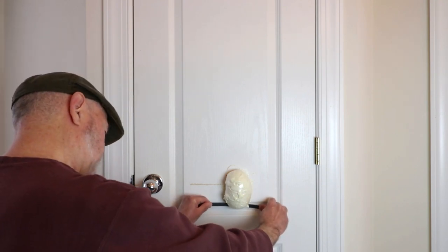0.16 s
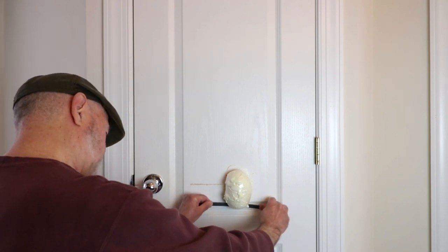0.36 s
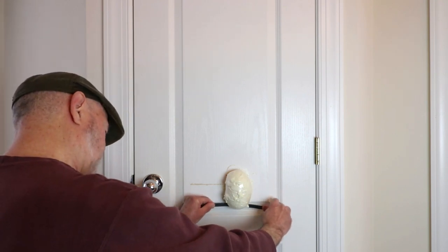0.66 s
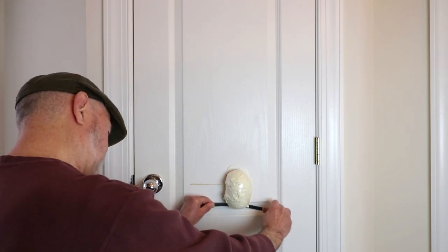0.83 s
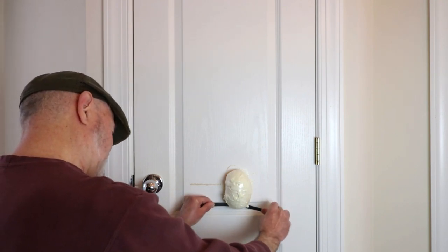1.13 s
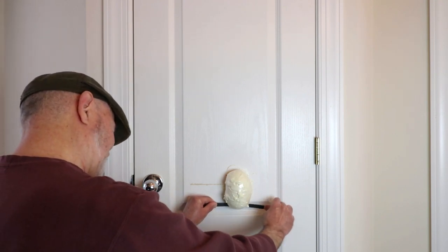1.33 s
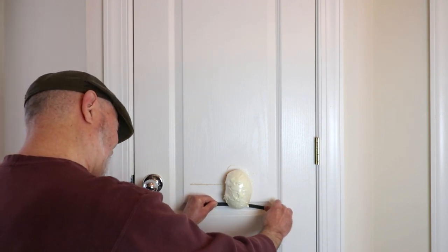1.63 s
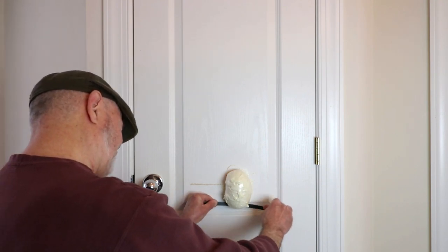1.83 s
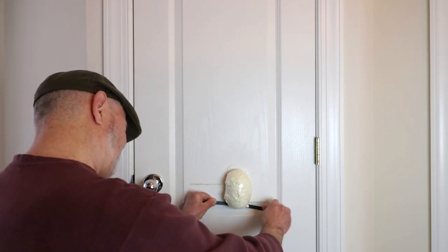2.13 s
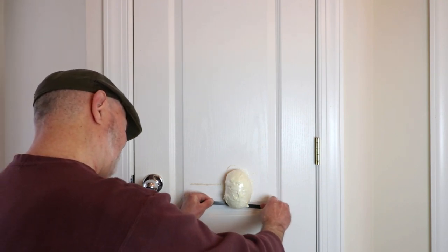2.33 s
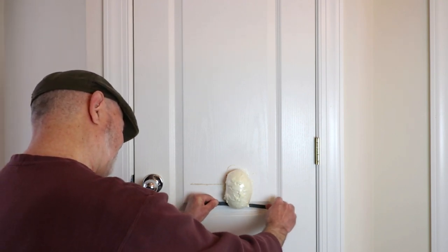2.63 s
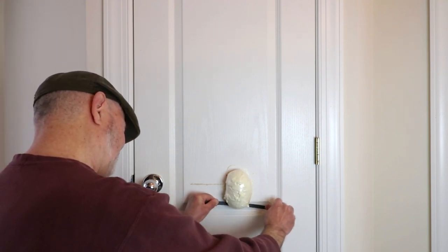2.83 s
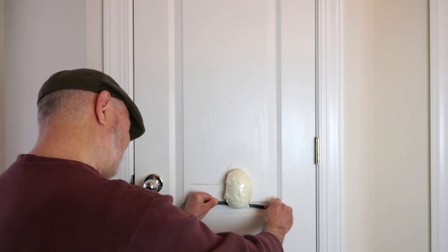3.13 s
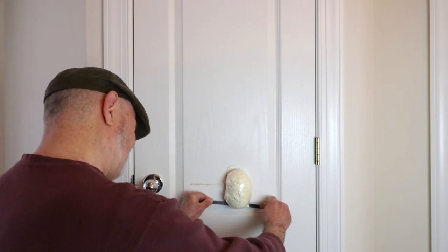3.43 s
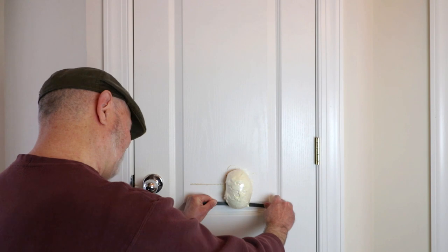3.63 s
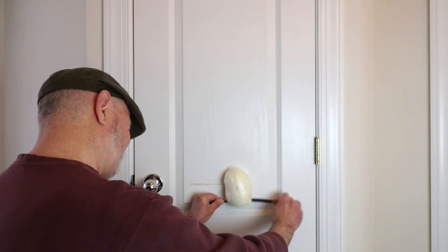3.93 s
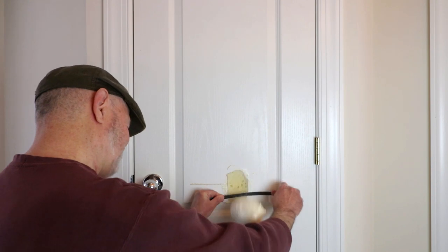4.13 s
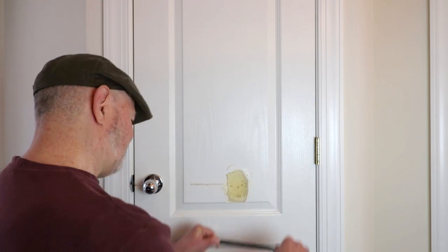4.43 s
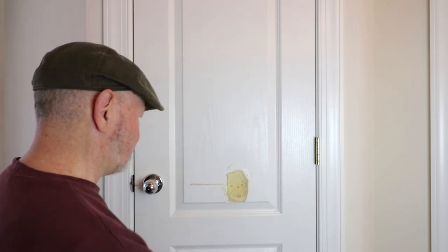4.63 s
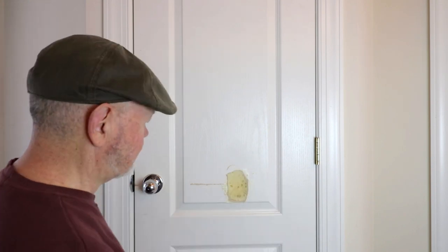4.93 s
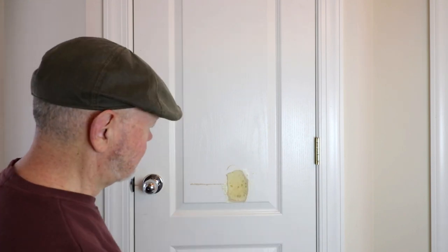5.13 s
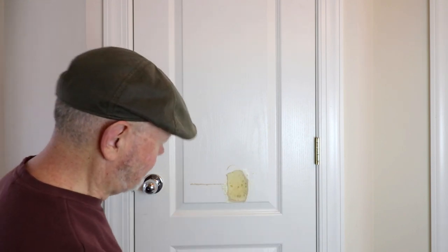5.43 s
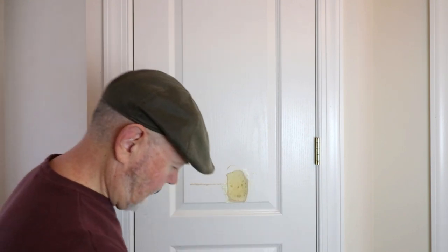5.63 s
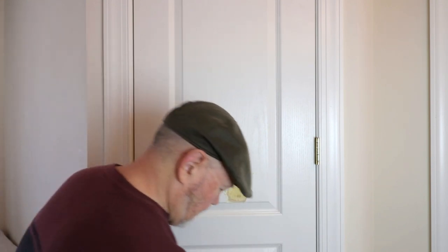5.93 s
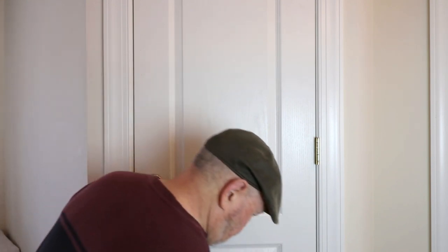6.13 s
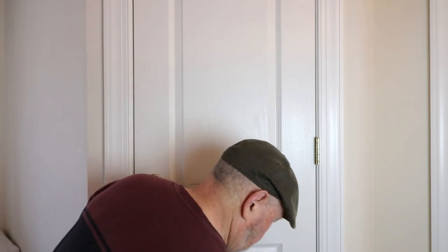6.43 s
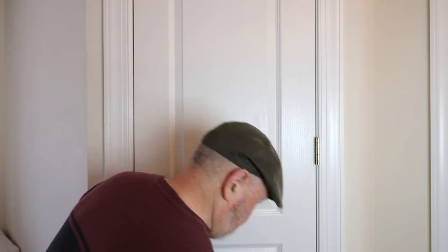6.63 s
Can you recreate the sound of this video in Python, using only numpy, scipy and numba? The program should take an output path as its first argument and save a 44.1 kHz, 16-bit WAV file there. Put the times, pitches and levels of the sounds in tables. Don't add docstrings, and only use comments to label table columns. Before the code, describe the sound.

Uneven gritty saw scrapes and brittle cracks shake a hollow door, then a hard foam lump breaks free, hits the floor, bounces and gets handled.

```python
import sys
import numpy as np
from scipy import signal
from scipy.fft import rfft, irfft
from scipy.io import wavfile
from scipy.ndimage import uniform_filter1d
from numba import njit

SR = 44100
rng = np.random.default_rng(int(sys.argv[2]) if len(sys.argv) > 2 else 0)


def store_pcm(level_fs):
    pcm = np.round(np.clip(level_fs, -1, 1) * 32767).astype(np.int16)
    wavfile.write(sys.argv[1], SR, np.atleast_2d(pcm).T)


def rack_gain(trim_db):
    fader = np.asarray(trim_db, float)
    return 10 ** (fader / 20)


N = 298539
T = np.arange(N) / SR


def unit(x):
    return x / np.sqrt(np.mean(x ** 2))


def peak_unit(x):
    return x / np.abs(x).max()


def band(x, lo_hz, hi_hz):
    sos = signal.butter(3, [lo_hz, min(hi_hz, .45 * SR)], "bandpass", fs=SR, output="sos")
    return signal.sosfilt(sos, x)


def colour(x, points, size=4096):
    hz, db = np.transpose(points)
    bins_hz = np.arange(size // 2 + 1) * SR / size
    log_gain = np.interp(np.log(bins_hz + 1), np.log(hz), db) * np.log(10) / 20
    ceps = irfft(log_gain)
    ceps[1:size // 2] *= 2
    ceps[size // 2 + 1:] = 0
    response = irfft(np.exp(rfft(ceps)))
    return signal.fftconvolve(x, response)[:len(x)]


@njit
def svf(x, hz, width):
    y, b, l = np.empty(len(x)), 0., 0.
    for i in range(len(x)):
        g, k = np.tan(np.pi * hz[i] / SR), width / hz[i]
        v = (b + g * (x[i] - l)) / (1 + g * (g + k))
        b, l, y[i] = 2 * v - b, l + 2 * g * v, k * v
    return y


def resonate(x, hz, width_hz):
    return svf(x, np.full(len(x), float(hz)), float(width_hz))


def walk(rate):
    k = int(SR / rate)
    held = np.repeat(rng.standard_normal(N // k + 1), k)
    return 1.56 * uniform_filter1d(uniform_filter1d(held, k), k)[:N]


def add(out, s, x):
    i = int(s * SR)
    out[i:i + len(x)] += x[:N - i]


def on_curve(table):
    s, db = np.transpose(table)
    return rack_gain(np.interp(T, s, db))


def air():
    # frequency in Hz, level in dB per Hz.
    air_outline = [(59, -26), (100, 3), (149, 0.5), (242, -3), (286, -9), (550, -12), (611, -15),
                   (693, -14.5), (1060, -17), (2780, -18.5), (3290, -13.5), (4910, -22), (15300, -36)]
    # time in seconds, level in dB.
    rustle = [(0, -58.5), (.3, -66), (.5, -51.5), (.95, -81), (1.2, -58.5), (1.6, -50.5), (1.9, -56.5),
              (2.45, -53), (2.95, -66), (3.25, -46), (3.8, -44.5), (4.25, -52.5), (4.45, -67.5), (5.2, -45),
              (5.68, -50.5), (5.95, -48), (6.25, -52), (6.77, -42.5)]
    hiss = unit(colour(rng.standard_normal(N), air_outline))
    fibres = rng.standard_normal(N) * rack_gain(1.2 * walk(70))
    cloth = unit(band(colour(fibres, air_outline), 510, 11200))
    fan = rack_gain(-66) * unit(resonate(rng.standard_normal(N), 241, 11))
    self_noise = rack_gain(-64.5) * rng.standard_normal(N)
    return rack_gain(-60) * hiss + fan + self_noise + on_curve(rustle) * rack_gain(1.38 * walk(9) - 1) * cloth


def pushed(column, rise_db, fall_db, rest_db):
    # time in seconds, sway in dB, drum in dB.
    pushes = np.array([(0, -47, -41.5), (.19, -40.5, -47.5), (.63, -41, -28.5), (.79, -50, -41),
                       (.92, -44, -41.5), (1.32, -41.5, -54), (1.43, -42, -39), (1.53, -37, -34.5),
                       (1.6, -42, -44), (1.731, -39.5, -57), (1.9, -46.5, -51), (2.15, -40.5, -46),
                       (2.33, -47, -31.5), (2.62, -42, -32), (2.79, -33.5, -57), (3.11, -47, -36),
                       (3.26, -39, -52), (3.35, -40, -36), (3.45, -49, -35), (3.58, -32.5, -33),
                       (3.7, -46, -31), (3.87, -33, -29), (3.93, -40, -30.5), (4.03, -31, -33),
                       (4.15, -33, -34.5), (4.38, -45, -54), (4.66, -68, -43), (4.92, -63, -38.5),
                       (6.22, -65, -66), (6.75, -72, -46)])
    late = T - pushes[:, :1]
    db = pushes[:, column, None] + np.minimum(rise_db * late, -fall_db * late)
    return rack_gain(np.maximum(db.max(axis=0), rest_db))


def boom():
    push = rng.standard_normal((2, N))
    sway = unit(band(push[0], 21.2, 67.6))
    drum = unit(resonate(band(push[1], 58.0, 140), 95, 13.7))
    sway_gain = pushed(1, rise_db=150, fall_db=61, rest_db=-67)
    drum_gain = pushed(2, rise_db=210, fall_db=109, rest_db=-63)
    return sway_gain * sway + drum_gain * drum


def thuds():
    # time in s, peak in dB, pitch in Hz, t60 in s, swell in s.
    latch = [(0.16, -32.5, 74, 0.13, 0.0014), (.573, -25, 593, 0.11, 0.0026),
             (0.889, -35, 142, 0.13, 0.0057), (1.16, -43.5, 623, 0.13, 0.012), (1.17, -40, 200, 0.14, 0.02),
             (1.322, -32, 171, 0.025, 0.00065), (1.422, -27.5, 84.6, 0.44, 0.0023),
             (2.122, -29.5, 166.5, 0.18, 0.0035), (2.581, -21, 100, 0.08, 0.0019),
             (3.094, -20, 150, 0.16, 0.0017), (3.1, -28.5, 214.7, 0.24, .01),
             (3.284, -13, 175, 0.074, 0.0037), (3.565, -20, 70.5, 0.12, 0.0048),
             (3.836, -14, 146, 0.089, 0.00087), (3.838, -10.5, 330, 0.02, .001),
             (3.948, -12, 410, 0.086, 0.006), (3.4, -22.5, 191, 0.33, .03), (3.988, -32, 245, 0.72, 0.054)]
    # time in s, peak in dB, pitch in Hz, t60 in s, swell in s.
    bounces = [
        (4.567, -20.5, 150, 0.14, 0.00082),
        (4.566, -8.5, 458, 0.035, 0.00073),
        (4.568, -14.5, 350, 0.054, 0.0013),
        (4.849, -19, 182, 0.084, 0.0022),
        (4.846, -11, 530, 0.03, 0.00074),
        (4.908, -7.5, 249.4, 0.15, 0.013),
        (4.931, -12.5, 396, 0.09, 0.0059),
        (5.762, -41.5, 176, 0.14, 0.0028),
        (6.113, -42, 640, 0.1, 0.0045),
        (6.2, -43, 83, 0.3, 0.018),
    ]
    # time in s, peak in dB,
    # pitch in Hz, t60 in s, swell in s.
    rings = [(.543, -37, 2450, .03, 0.0044), (.565, -32, 2800, .06, .006), (.572, -26, 1420, .08, .006),
             (.59, -29, 1080, 0.22, .01), (1.175, -45, 620, 0.11, .01), (1.25, -48.5, 620, .12, .01),
             (1.258, -51, 3050, .08, .008), (1.425, -35, 610, .15, .006), (1.49, -39, 3600, .04, .004),
             (1.4, -34, 3150, .04, 0.0086), (1.428, -33, 3200, .05, .003), (2.126, -24, 1410, .04, .002),
             (2.181, -25, 1410, 0.039, .002), (3.92, -28, 400, .1, .01), (4.0, -25, 420, .1, .008),
             (4.16, -31, 380, .2, .02), (3.85, -21.5, 177, .12, 0.0045), (3.955, -24.5, 151, .15, 0.0087),
             (4.7, -27, 170, 0.14, .01), (3.3, -26.5, 800, .15, .015), (2.63, -25, 613, .08, .004),
             (2.634, -28, 3600, .05, 0.0026), (2.26, -33, 250, 0.14, .01),
             (2.208, -32.5, 1020, 0.055, .005), (2.245, -35, 1400, 0.087, .008),
             (3.68, -30, 165, 0.19, 0.028), (3.094, -31, 470, 0.037, 0.0023), (3.157, -43, 1850, .04, .002),
             (3.6, -37, 220, .08, .008), (3.282, -23, 660, 0.085, 0.0035), (3.315, -26.5, 1150, 0.24, .02),
             (3.31, -29, 1332, 0.23, 0.022), (3.303, -31, 2310, .08, .008), (3.322, -15, 180, .08, .018),
             (3.35, -18, 620, 0.089, 0.0073), (3.3, -24.5, 640, 0.11, 0.0088), (3.39, -27, 980, .06, .005),
             (3.365, -24, 336, .07, .006), (3.375, -28, 970, .08, 0.007),
             (3.862, -24, 150, .15, 0.0066), (3.885, -23, 135, .15, .006),
                  (3.915, -21.5, 200, .09, .01), (3.97, -25, 520, .15, .012), (3.99, -21, 150, .12, .01),
                  (4.02, -20.5, 264, 0.09, 0.0091), (4.024, -25.5, 600, 0.072, .006),
                  (4.072, -25, 171, .15, .015), (4.06, -28, 330, .12, .01)]
    # time in s, peak in dB, pitch in Hz, t60 in s, swell in s.
    lump_rings = [(4.58, -20, 161, .15, 0.0094), (4.567, -21, 2982, 0.089, 0.0018),
                  (4.57, -23.5, 3413, 0.21, .004), (4.568, -27, 3801, 0.074, .002),
                  (4.57, -27, 1782, .2, .004), (4.57, -29, 2200, .2, .004), (4.59, -24, 465, .12, .008),
                  (4.65, -24, 380, 0.21, .02), (4.675, -29.5, 850, 0.094, 0.011),
                  (4.86, -20.5, 620, .07, .006), (4.91, -18, 420, 0.056, .006), (4.7, -27, 400, .15, .02),
                  (4.847, -21, 2510, .03, .001), (4.87, -26, 1335, .1, 0.011), (5.805, -46, 400, 0.16, .02),
                  (5.902, -40, 1300, .04, .002), (5.904, -42, 1850, .07, .003),
                  (6.482, -41, 3300, .05, .003), (5.903, -38.5, 3200, .07, .003),
                  (5.928, -46, 2700, .1, .006), (5.9, -45, 160, .07, .004), (6.138, -44, 660, .1, .006),
                  (6.18, -54, 660, .06, .004)]
    out, t = np.zeros(N), np.arange(int(.4 * SR)) / SR
    blows = [(*row, True) for row in latch + bounces]
    plain = [(*row, False) for row in rings + lump_rings]
    for s, db, hz, t60, swell, blow in blows + plain:
        fade_from = 0 if blow else swell
        fade = np.exp(-np.log(1000) * np.maximum(t - fade_from, 0) / t60)
        wave = fade * np.sin(2 * np.pi * hz * t)
        if blow:
            wave += 0.23 * fade ** 2 * np.sin(2 * np.pi * 2.3 * hz * t)
        add(out, s, rack_gain(db) * wave * np.minimum(t / swell, 1))
    return band(out, 66, 9400)


def blade():
    # start in s, end in s, start in Hz, end in Hz, level in dB.
    chirps = [
        (1.472, 1.486, 14000, 10500, -41),
        (2.249, 2.259, 13100, 13800, -32),
    ]
    # start in s, end in s, start in Hz, end in Hz, level in dB.
    squeals = [
        (2.245, 2.315, 13400, 13000, -46),
        (2.553, 2.585, 13000, 14100, -34),
        (2.572, 2.615, 14200, 14000, -33),
        (2.612, 2.628, 8600, 7500, -38),
    ]
    # start in s, end in s, start in Hz, end in Hz, level in dB.
    hisses = [(2.225, 2.3, 15000, 14200, -51), (1.585, 1.635, 8800, 8800, -54),
              (2.54, 2.63, 6200, 6200, -43), (2.63, 2.72, 6500, 5800, -35), (3.257, 3.38, 9800, 9000, -45),
              (3.856, 3.94, 9800, 9500, -45), (3.955, 4.09, 9800, 9000, -46)]
    skips_s = [2.657, 2.667, 2.675, 2.686, 2.698, 2.706, 2.712, 2.72, 2.726, 2.733, 2.738, 2.744, 2.75,
               2.755, 2.76, 2.772, 2.798]
    out = np.zeros(N)
    for rows, width_hz in ((chirps, 250), (squeals, 1200), (hisses, 2200)):
        for t0, t1, hz0, hz1, db in rows:
            u = np.arange(int((t1 - t0) * SR)) / ((t1 - t0) * SR)
            hz = hz0 + (hz1 - hz0) * u
            noise = rng.standard_normal(size=8000)[:len(u)]
            squeal = svf(svf(noise, hz, 1. * width_hz), hz, 2. * width_hz)
            add(out, t0, rack_gain(db) * unit(squeal) * np.sin(np.pi * u) ** .5)
    chatter_hz, chatter_width_hz, chatter_db = 13800, 2000, -29
    chance = rng.standard_normal((40, 2))[:len(skips_s)]
    times = skips_s + .0002 * chance[:, 0]
    teeth = np.zeros(N)
    teeth[(times * SR).astype(int)] = rack_gain(2 * chance[:, 1])
    to_peak = SR / (2 * np.pi * chatter_width_hz)
    return out + rack_gain(chatter_db) * to_peak * resonate(teeth, chatter_hz, chatter_width_hz)


def sparks():
    # time in seconds, peak in dB, pitch in Hz.
    grains = [(.534, -44, 7000), (.553, -38, 7000), (.784, -48, 6500), (.987, -51, 10000),
              (1.048, -53, 9000), (1.18, -51, 8500), (1.186, -52, 9500), (1.268, -52, 9000),
              (1.333, -53, 9000), (1.362, -52, 8000), (3.255, -40, 9000), (3.284, -25, 8000),
              (3.291, -34, 8000), (3.313, -34, 9000), (3.326, -30, 9500), (3.336, -37, 9500),
              (3.347, -36, 10000), (3.365, -35, 8500), (3.373, -36, 8500), (3.618, -38, 8000),
              (3.757, -45, 13500), (3.818, -48, 9000), (3.832, -45, 10000), (3.844, -48, 11000),
              (3.872, -38, 9500), (4.037, -30, 11500), (4.96, -36, 7000), (5.215, -42, 7000),
              (6.609, -38.5, 7000)]
    out, t = np.zeros(N), np.arange(int(.01 * SR)) / SR
    for (s, db, hz), noise in zip(grains, rng.standard_normal((len(grains), len(t)))):
        tick = resonate(noise * np.exp(-t / .0012), hz, 0.41 * hz)
        add(out, s, rack_gain(db) * peak_unit(tick))
    return out


def snaps():
    # time in s, peak in dB,
    # then body, crack and ring shares in dB.
    shallow = [(1.4066, -36, -3, -12, 4), (1.4286, -28, -1.5, -0.5, -3), (1.6885, -31, -13, -15, -16),
               (2.602, -30, 6.5, -11, -11), (2.6275, -9, -6.5, 6.5, -6.5), (3.096, -35, -13, -14, -14),
               (3.122, -31.5, -6, -16, -19), (3.159, -26, -25, -3.5, -16), (3.26, -26, -22, -7, -3),
               (3.283, -18, -0.5, -11, -1), (3.8547, -12, -13, 1, -6.5), (3.9507, -3.5, -7.5, -4.5, -9.5),
               (4.03, -12.5, -6, -0.5, -7.5), (4.038, -20, -11, 1.5, -11), (4.567, 1, -7.5, -34, -8.5),
               (5.0514, -24, -1.5, -21, -9), (5.1215, -32, -21, -14, 0.5), (5.1685, -33, 1, -27, -17),
               (5.905, -36, -9, -18, -12), (6.4836, -32.5, -14, -23, -3.5), (6.634, -20, -11, -8, -5.5)]
    # time in s, peak in dB, then
    # body, crack and ring shares in dB.
    deep = [(0.568, -20, -2, -2, -8), (.587, -17, -4.5, -20, 0.5), (1.5355, -35, -10, 3, -6),
            (1.7601, -26.5, -4.5, -14, -12.5), (2.0908, -36.5, -8, -8, -5), (2.1252, -14, -14, -13.5, -7.5),
            (2.1803, -15, -17, -12, -6), (4.8465, -5, -7.5, -11, -15), (5.21, -26, -8, -16, -25.5)]
    # time in seconds, peak in dB.
    ticks = [(0.279, -44.5), (0.3187, -40.5), (.548, -34), (0.9804, -39), (1.717, -39), (2.97, -41),
             (3.0056, -42.5), (3.09, -41), (3.757, -41), (3.832, -47), (5.0674, -41)]
    # frequency in Hz, level in dB per Hz.
    knock = [(150, -30), (250, -11.5), (365, -8), (412, -6), (465, -11), (834, -10), (1030, -22),
             (1200, -8), (3420, -4.5), (4060, -14), (15300, -35.5)]
    gap_hz, deep_gap_hz = 3110, 1344
    breaks = [(gap_hz, *row) for row in shallow]
    breaks += [(deep_gap_hz, *row) for row in deep]
    breaks += [(gap_hz, *row, -12, 4, -12) for row in ticks]
    out, t = np.zeros(N), np.arange(int(.06 * SR)) / SR
    noises = rng.standard_normal((len(breaks), len(t)))
    for (hz, s, db, body_db, crack_db, ring_db), noise in zip(breaks, noises):
        crumbs = noise * np.exp(-t / 0.006)
        burst = colour((t == 0) + 0.036 * crumbs, knock, size=1024)
        click = band(burst, 1510, 5600)
        gap = resonate(resonate(crumbs, hz, 0.33 * hz), hz, 1.06 * hz)
        body = band(burst, 172, 1033)
        crack = band(burst + 0.0036 * crumbs, 5000, 13100)
        layers = (click, 0), (gap, ring_db + 4), (body, body_db), (crack, crack_db)
        add(out, s, sum(rack_gain(db + share_db) * peak_unit(x) for x, share_db in layers))
    return out


def panel(x):
    # frequency in Hz, width in Hz, level in dB.
    modes = [(167, 57, 2.5), (236, 22, 2.5), (291, 25, -3.5), (455, 87, -10), (595, 25, -3.5),
             (672, 8.2, -4), (987, 230, -1.5), (1100, 180, -3), (1390, 106, 5.5)]
    return x + sum(rack_gain(db + 3.5) * resonate(x, hz, width_hz) for hz, width_hz, db in modes)


def strokes():
    # start in s, length in s, rasp in dB, door and
    # fine dust shares in dB.
    jerks = [(.574, 0.089, -26, 4, -21), (1.418, 0.082, -34, 0, -4), (1.486, 0.039, -33.5, 1, -12),
             (1.695, 0.046, -42.5, -2, -10), (1.77, 0.039, -44, 4.5, -5), (2.13, 0.12, -27.5, 0, -23),
             (2.254, .076, -28.5, 1.5, -13), (2.635, 0.083, -22, -9.5, -24), (3.352, 0.068, -23.5, 5, -30),
             (3.55, 0.031, -35, -8, -16), (3.865, 0.031, -26.5, 2, -22), (3.96, .06, -33, 3, -21),
             (4.032, 0.075, -26, 3, -20), (4.575, 0.18, -23.5, -6.5, -20.5),
             (4.852, 0.052, -18.5, -2.5, -20), (4.91, 0.11, -25.5, 0, -23), (5.068, .04, -31, 2, -27),
             (5.904, 0.052, -39.5, -6, -30), (6.484, 0.045, -38, -6.5, -11), (6.72, 0.039, -35, 1.5, -20)]
    # start in s, length in s, rasp in dB, door and fine
    # dust shares in dB.
    swells = [(.533, 0.051, -30.5, -1, -13), (1.456, 0.033, -36, -2, -3), (1.58, 0.057, -48.5, -12, 0.5),
              (1.74, 0.033, -45, -4, -0.5), (2.216, 0.04, -30.5, 0.5, -7.5), (2.52, 0.099, -31, 0, -6.5),
              (3.1, 0.096, -46, 0, -7), (3.254, 0.097, -22.5, -1.5, -10), (3.575, .045, -37.5, -11, -17),
              (5.11, 0.11, -41.5, -5.5, -21), (5.715, 0.15, -46, -4.5, -11), (6.57, 0.097, -35, -9.5, -19)]
    # start in s, length in s, rasp in dB, door and fine
    # dust shares in dB.
    drags = [(1.16, 0.029, -51.5, 3, -6), (2.645, 0.12, -27, -9.5, -13), (3.617, 0.11, -31, -4, -9),
             (3.895, 0.057, -29.5, 0.5, -10), (4.62, 0.07, -27.5, -3.5, -24),
             (4.315, 0.033, -45.5, 0.5, -13), (4.955, 0.034, -34, 2, -6), (5.21, 0.16, -39.5, -14.5, -8),
             (6.635, 0.083, -27.5, -6.5, -12)]
    # time in seconds, level in dB.
    grip = [(0, -10.5), (1.4, -1), (2.2, -3.5), (2.7, -3.5), (3.1, 14.5), (3.4, -5), (3.87, 5), (4.1, 3.5),
            (4.9, 3), (6.77, -4)]
    # share of the length up to the peak, dB at the start, dB at the end
    kinds = (jerks, (0.072, 2.8, -15)), (swells, (0.57, -14, -1.5)), (drags, (0.35, -5, -3.5))
    power = np.zeros((4, N))
    for table, (rise, start_db, end_db) in kinds:
        for s, length, db, door_db, dust_db in table:
            u = (T - s) / length
            contact = np.clip(np.minimum((T - s) / 0.0096 + .5, (s + length - T) / 0.015 + 1), 0, 1)
            door_db = door_db + 3 * np.clip(u, 0, 1)
            dust_db = dust_db - 6 * np.clip(u, 0, 1)
            gain = contact * rack_gain(db - 4.5 + np.interp(u, [0, rise, 1], [start_db, 0, end_db]))
            power += (gain * rack_gain(np.array([0 * u, door_db, dust_db, door_db]))) ** 2
    gains = np.sqrt(power)
    gains[3] *= on_curve(grip)
    return gains


def rasp():
    # frequency in Hz, level in dB per Hz.
    rasp_outline = [(76, -43.5), (130, -9.5), (179, -2), (246, -7.5), (325, -6.5), (536, -9.5), (604, -7.5),
                    (831, -12), (1120, -14.5), (1570, -15), (3290, -9.5), (6110, -25.5), (15300, -43)]
    # time in seconds, level in dB.
    middle_level = [(.6, -14), (1.5, -15), (2.2, -12), (2.7, -12), (3.3, -6), (4, -11), (4.65, -9), (4.9, -2),
                    (5.3, -9), (6.6, -6)]
    draw = rng.random((3, N))
    bursting = draw[0] < 2500 / SR
    sizes_db = np.minimum(-3.0 * np.log(1 - draw[2]), 12)
    cells = bursting * np.sign(draw[1] - .5) * rack_gain(sizes_db)
    scrape = unit(cells) + 0.78 * rng.standard_normal(N)
    grit = colour(scrape * rack_gain(1.86 * walk(150)), rasp_outline)
    wood = panel(grit)
    teeth = unit(band(grit, 1660, 6100))
    skin = unit(band(wood, 285, 1275))
    dust = unit(band(grit, 8040, 16500))
    core = unit(band(wood, 110, 318))
    gains = strokes()
    middle = unit(band(grit, 830, 1280)) * on_curve(middle_level) * gains[0]
    return np.sum(gains * (teeth, skin, dust, core), axis=0) + middle


def near_floor(x):
    on_floor = (T > 4.55) & (T < 4.2 )
    return x - on_floor * resonate(x, 1010, 160)


def hallway(x):
    # frequency in Hz, t60 in seconds, level in dB.
    echoes = [(100, 0.94, 0), (200, 0.72, -2), (411, 0.67, 1.5), (795, 0.77, -1.5), (1573, 0.68, -2),
              (3440, 0.58, -2), (6550, 0.39, 0), (13200, 0.23, -0.5)]
    t, tail = np.arange(int(1.3 * SR)) / SR, 0
    for (hz, t60, db), noise in zip(echoes, rng.standard_normal((len(echoes), len(t)))):
        octave = band(noise, hz / np.sqrt(2), hz * np.sqrt(2))
        tail = tail + rack_gain(db) * octave * np.exp(-np.log(1000) * t / t60)
    tail = tail * np.clip((t - 0.0015) / 0.0053, 0, 1)
    return rack_gain(-5.5) * signal.fftconvolve(x, tail / np.sqrt(np.sum(tail ** 2)))[:N]


def scene():
    foam = near_floor(rasp() + snaps())
    blows = thuds()
    squeals = blade() + sparks()
    echo = hallway(foam + 0.39 * blows + 0.17 * squeals)
    mono = foam + blows + squeals + echo + boom() + air()
    return np.array([mono, mono])


def band_limit(x):
    return signal.sosfilt(signal.butter(12, 16810, fs=SR, output="sos"), x)


def record(dry):
    # frequency in Hz, gain in dB.
    presence = [(2300, 0), (3000, 1), (3700, 1), (4050, -1), (5500, 0.43)]
    ceiling = .76
    dry = np.array([colour(c, presence, size=1024) for c in dry])
    treble = np.array([band(c, 5500, 11300) for c in dry])
    grain = 0.0037 * dry * walk(400) + 0.12 * treble * rng.standard_normal(N)
    grain = grain * np.array([[1], [-1]])
    top = signal.ellip(8, .2, 60, 15450, fs=SR, output="sos")
    mix = signal.sosfilt(top, np.clip(dry + grain, -ceiling, ceiling))
    return band_limit(mix)


dry = scene()
out = record(dry)
store_pcm(out)
```